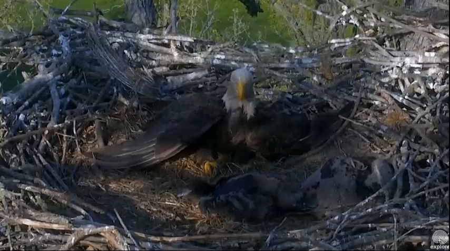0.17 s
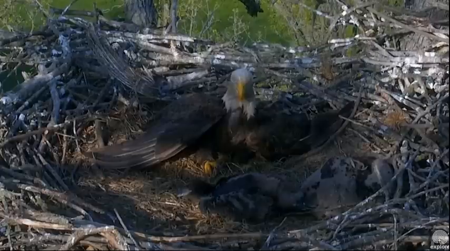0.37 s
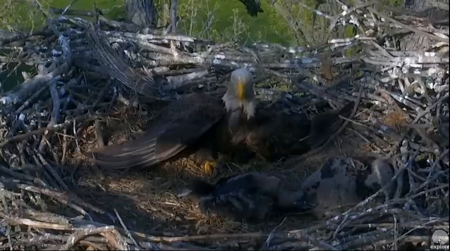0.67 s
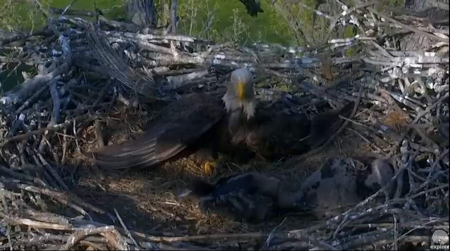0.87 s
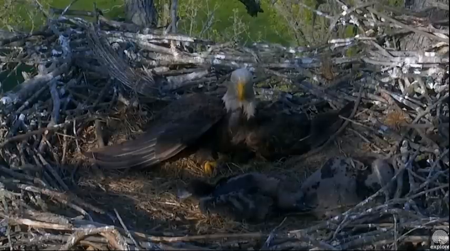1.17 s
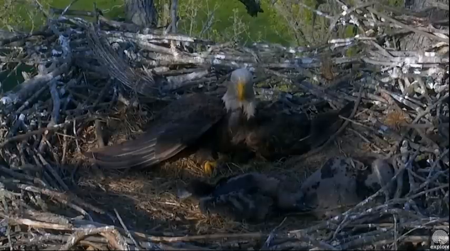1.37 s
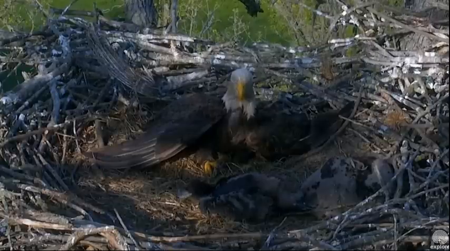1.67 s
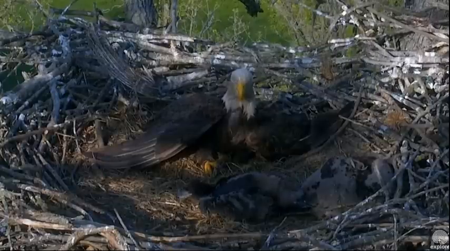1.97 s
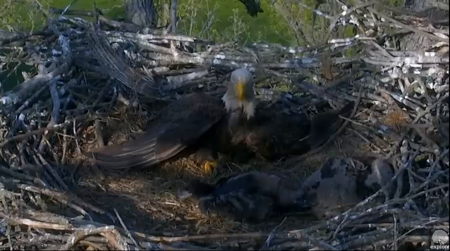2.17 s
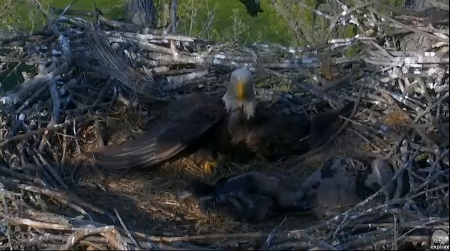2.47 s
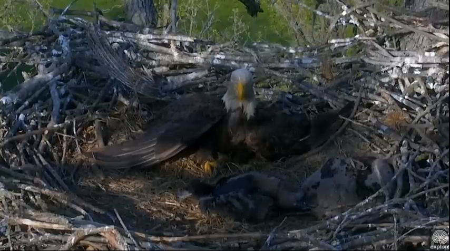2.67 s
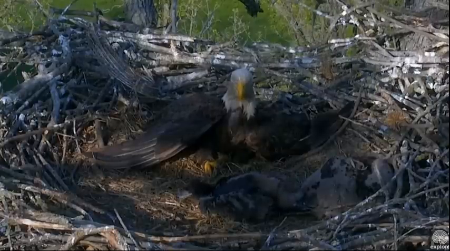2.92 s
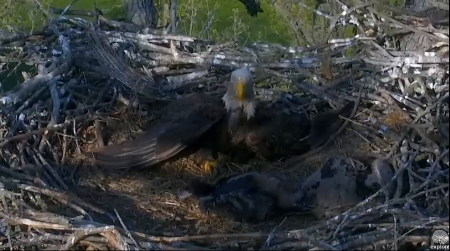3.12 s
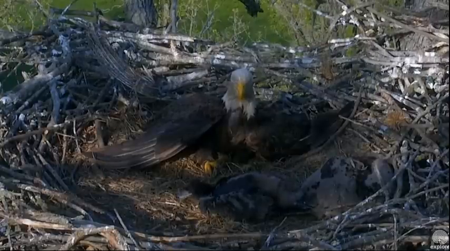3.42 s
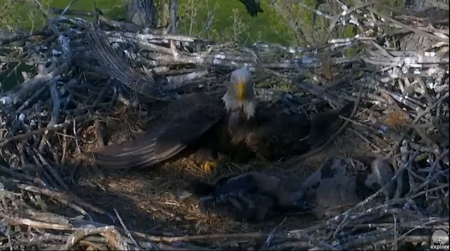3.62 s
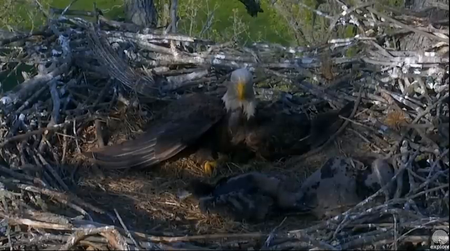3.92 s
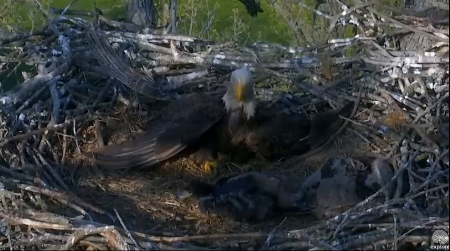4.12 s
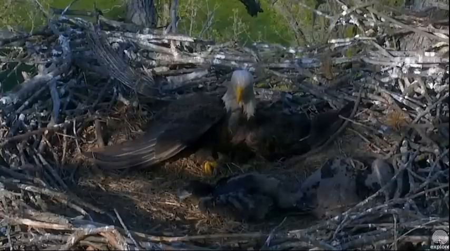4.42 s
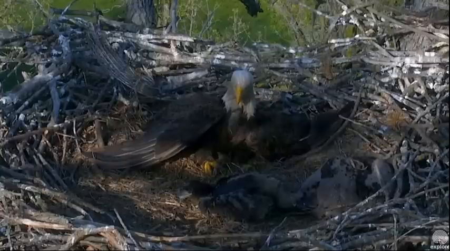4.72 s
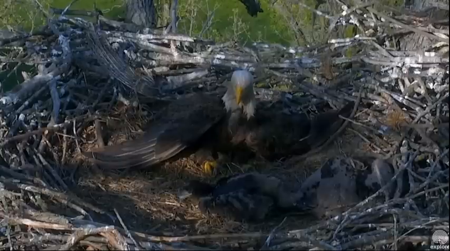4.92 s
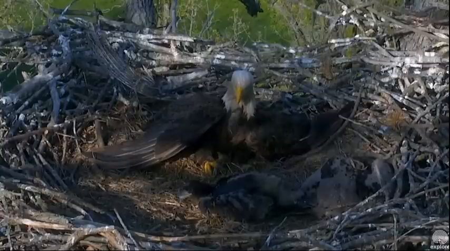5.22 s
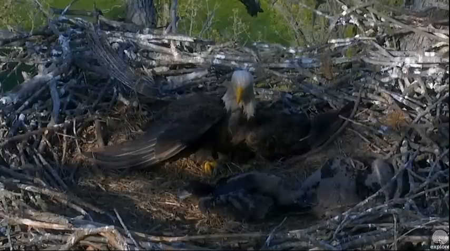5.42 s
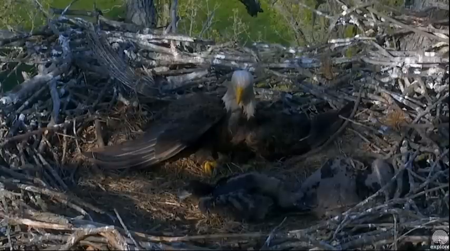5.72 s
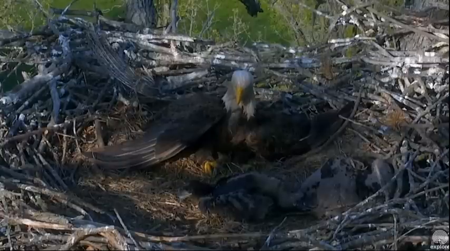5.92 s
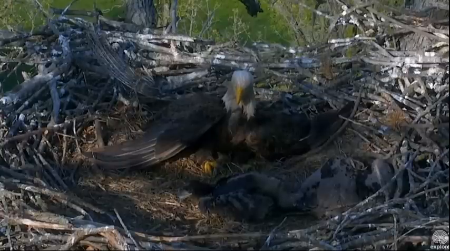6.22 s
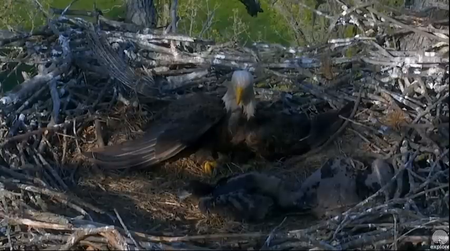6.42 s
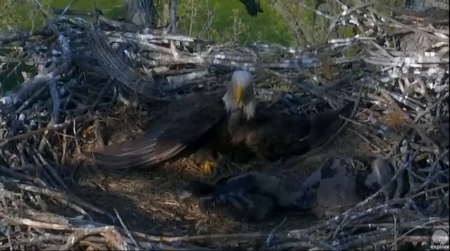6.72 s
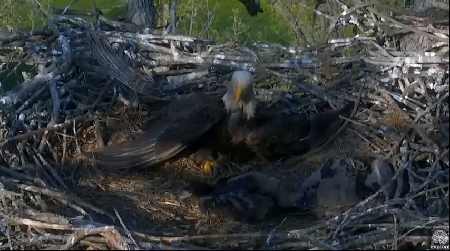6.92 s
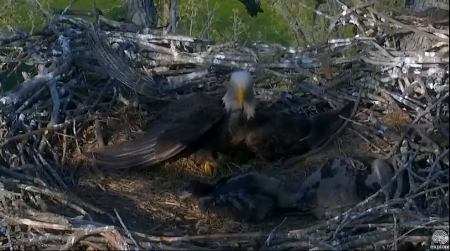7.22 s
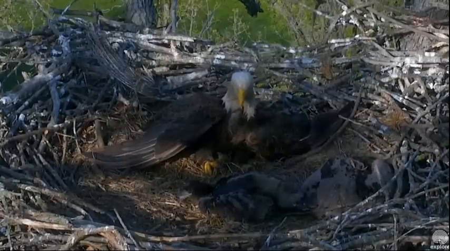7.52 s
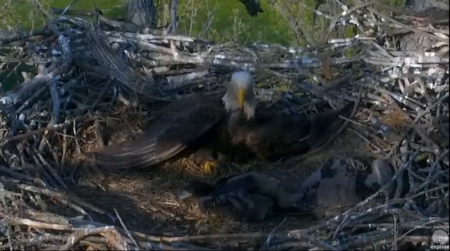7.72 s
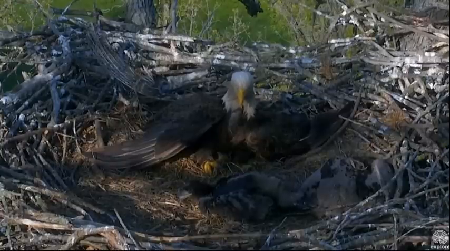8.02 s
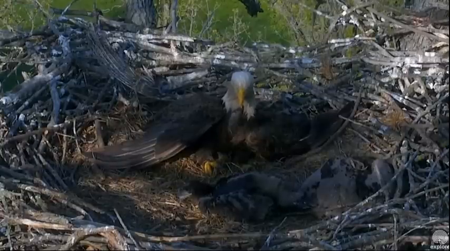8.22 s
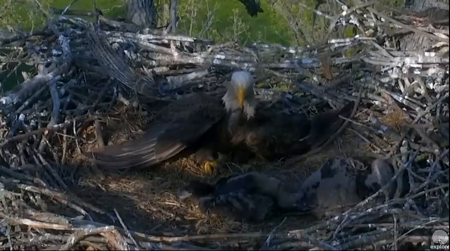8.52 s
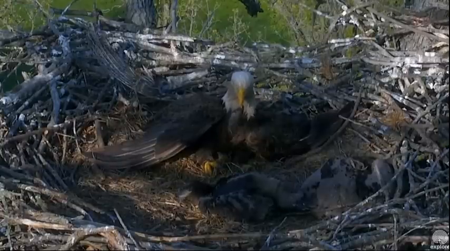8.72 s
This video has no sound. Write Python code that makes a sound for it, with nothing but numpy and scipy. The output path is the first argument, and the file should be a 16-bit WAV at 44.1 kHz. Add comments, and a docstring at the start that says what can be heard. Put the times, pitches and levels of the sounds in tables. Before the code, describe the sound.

Toads trill steadily outdoors, overlapping at different pitches, while small birds chirp faintly in the background over a soft hiss.

```python
"""Toads trill in a marsh, four overlapping voices that swell to one peak and then ease off.
Each trill is a fast run of pulses from the voice box that make the toad's throat sac ring.
Small birds chirp and twitter faintly among the trees, over a far toad chorus and soft hiss.
A camera's narrow-band microphone channel adds a low buzz, a thin motor whine
and faint mirror tones in the treble."""
import sys
import numpy as np
from scipy import signal
from scipy.fft import rfft, irfft
from scipy.io import wavfile

SR = 44100
rng = np.random.default_rng(int(sys.argv[2]) if len(sys.argv) > 2 else 0)


def master_out(mix):
    """Clip the mix to full scale and print it as 16-bit PCM to the path in sys.argv[1]."""
    frames = np.transpose(np.atleast_2d(mix))
    ceiling = np.clip(frames, -1, 1)
    pcm = np.round(ceiling * 32767).astype(np.int16)
    wavfile.write(sys.argv[1], SR, pcm)


N = 391166
TIME = np.arange(N) / SR
HZ = np.fft.rfftfreq(N, 1 / SR)

PEAK_S, BUILD_DB_PER_S, EASE_DB_PER_S = 5.74, 0.92, 2.45  # the toads egg each other on, then ease off
DRAG_HZ, DRAG_S = 3.8, .17  # the last pulses slow down as the air runs out
# When each toad calls and how fast it pulses; a negative slowing speeds it up.
# start_s, end_s, pulse_rate_hz, extra_starting_rate_hz, slowing_hz_per_s
TOAD_TRILLS = [(.014, 9.5, 44.906, 0, .2383), (1.203, 7.86, 41.864, 6.48, .0477),
               (1.902, 7.04, 47.207, 4.986, .737), (6.907, 9.5, 45.605, 0, -.933)]
# The toad behind each trill: low, near, high and far.
# pitch_hz, level_at_peak_db, fade_in_s, share_of_swell, open_share_of_pulse, slip_per_pulse_radians
TOAD_VOICES = [(1745, -51.5, 0.0067, 0.82, 0.48, 1.6), (1828, -47.5, 0.18, .7, 0.59, 1.222),
               (1929, -49.5, 0.014, 1.5, 0.38, 1.602), (1883, -60.5, .05, 0.5, .4, 1.8)]


def toad(trill, voice, settle_s=1.0, uneven_db=1.2, sac_half_width_hz=146):
    """The voice box opens and shuts; each opening makes the throat sac ring with one short tone."""
    start_s, end_s, base_hz, extra_hz, slowing = trill
    pitch_hz, level_db, fade_in_s, swell_share, open_share, slip_radians = voice
    age = np.maximum(TIME - start_s, 0)
    rate_hz = base_hz + extra_hz * np.exp(-age / settle_s) - slowing * age
    rate_hz -= DRAG_HZ * np.exp(np.minimum(TIME - end_s, 0) / DRAG_S)
    cycles = np.cumsum(rate_hz * (age > 0)) / SR
    pulse, place = cycles.astype(int), cycles % 1 - .5  # place is 0 in the middle of a pulse
    opening = np.exp(-abs(place / (open_share / 2)) ** 3)
    opening *= (1 - np.exp(-age / fade_in_s)) * np.clip((end_s - TIME) * 200, 0, 1)
    swell_db = np.minimum(BUILD_DB_PER_S * (TIME - PEAK_S), EASE_DB_PER_S * (PEAK_S - TIME))
    # each pulse is a little out of step with the last, and a little louder or softer
    slip, strength = rng.standard_normal((1024, 2)).T
    phase = 2 * np.pi * pitch_hz * TIME + slip_radians * np.cumsum(slip)[pulse] + 2 * wander(4)
    loudness = amp(level_db + swell_share * swell_db + uneven_db * strength[pulse])
    throat_sac = np.exp(-((HZ - pitch_hz) / sac_half_width_hz) ** 4)
    return filtered(loudness * opening * np.sin(phase) / np.sqrt(open_share / 2), throat_sac)


# Quick falling chirps: start_s, length_s, first_pitch_hz, level_db
BIRD_CHIPS = [(0.235, .05, 3030, -69.5), (0.31, 0.021, 4060, -71), (0.354, .048, 2920, -70.5),
              (.425, 0.046, 3190, -72), (0.529, 0.028, 3830, -71), (.637, 0.034, 3910, -77),
              (0.686, .042, 3970, -75.5), (0.821, 0.013, 3530, -68.5), (.863, .036, 3990, -77.5),
              (1.028, 0.05, 3090, -69), (1.039, .03, 4000, -76), (1.683, .055, 2680, -71),
              (2.236, 0.071, 3140, -73), (3.058, .045, 2940, -68), (4.19, .04, 2710, -65),
              (4.445, .05, 2710, -69), (5.74, 0.025, 3700, -72), (5.898, 0.03, 3800, -75.5),
              (8.277, 0.071, 3740, -73.5), (8.748, .03, 3840, -71.5)]
# Sliding whistles: start_s, length_s, middle_pitch_hz, slide_hz, level_db, roughness_0_to_1
BIRD_WHISTLES = [(.52, 0.18, 2210, 47, -71.5, 0.3), (.72, .06, 2920, 249, -72, 0.3),
                 (1.114, .048, 2390, 110, -68, 0.1), (1.157, .06, 2060, -115, -66.5, 0.1),
                 (1.691, 0.062, 2975, -170, -75, .5), (1.8, .096, 2150, 110, -74.5, .2),
                 (2.684, .13, 2274, -110, -67, 0.26), (2.962, 0.021, 2640, 391, -64, 0.12),
                 (3.415, 0.17, 3030, -43.5, -72.5, 0.15), (3.556, 0.1, 2760, -180, -64, 0.4),
                 (3.658, 0.16, 3276, 159, -62.5, 0.24), (3.762, 0.087, 3550, -160, -67, 0),
                 (5.157, 0.088, 2500, 247, -71.5, 0), (5.16, 0.11, 3120, 150.5, -78, .4),
                 (6.197, 0.15, 2440, 352.5, -75, .4), (6.818, 0.045, 3310, 529.5, -74, 0.65),
                 (7.006, .038, 3260, 576, -75, 0.44), (7.173, 0.018, 2540, 659, -74, .03),
                 (8.341, .09, 2840, 998, -74, 0.4), (8.45, 0.13, 3185, -200, -74, 0.34),
                 (8.601, 0.065, 2620, -340, -79, 0.3), (8.825, .05, 3370, 287.5, -75, 0.4)]
# Harsh buzzing calls: start_s, length_s, middle_pitch_hz, slide_hz, level_db
BIRD_RASPS = [(-.04, 0.28, 3230, 26, -68.5), (1.197, 0.11, 3020, -20, -75.5),
              (2.734, 0.38, 3167, 61.5, -67.5), (3.721, 0.24, 3180, -17, -69.5),
              (4.16, .12, 3250, -130, -74.5), (4.213, 0.29, 2494, 291.5, -72.5),
              (4.485, .2, 2870, 460, -73), (4.96, 0.38, 3030, 201, -73)]
# Calls that flick up, break and flick down: break_s, flick_length_s, top_pitch_hz, fall_level_db
BIRD_FLICKS = [(2.577, 0.047, 3170, -65), (4.705, 0.052, 3894, -64.5), (8.004, .034, 3030, -68)]


def birds(warble_hz=130, warble_depth_hz=300, light_roughness=.14, rasp_roughness=.9):
    """Each note is a gliding whistle; a fast, uneven wobble in pitch makes it rough."""
    along = np.linspace(0, 1, 5)  # five points from a note's start to its end
    chip_shape = 1 - .31 * along ** .94  # falls fastest at first
    notes = [(s, length, hz * chip_shape, db, light_roughness) for s, length, hz, db in BIRD_CHIPS]
    slides = list(BIRD_WHISTLES) + [(*rasp, rasp_roughness) for rasp in BIRD_RASPS]
    for start_s, length_s, hz, slide_hz, db, roughness in slides:
        notes.append((start_s, length_s, hz + slide_hz * (along - .5), db, roughness))
    for break_s, length_s, hz, db in BIRD_FLICKS:
        fall = hz * (1 - .28 * along ** 1.2)
        notes.append((break_s - length_s, length_s, fall[::-1], db - 2, light_roughness))  # softer rise
        notes.append((break_s, length_s, fall, db, light_roughness))
    out = np.zeros(N)
    warble = np.sin(2 * np.pi * warble_hz * TIME + 2.3 * wander(120))
    for start_s, length_s, pitches, db, roughness in notes:
        during = (TIME >= start_s) & (TIME < start_s + length_s)
        progress = (TIME[during] - start_s) / length_s
        pitch_hz = np.interp(progress, along, pitches) + warble_depth_hz * roughness * warble[during]
        loudness = amp(db) * np.sqrt(2 * np.sin(np.pi * progress))
        out[during] += loudness * np.sin(2 * np.pi * np.cumsum(pitch_hz) / SR)
    return out


# How the far twitter rises and falls: time_s, level_db
FLOCK_LEVELS = [(0, -68.5), (.4, -80), (1.3, -77), (2, -92), (3.2, -74), (5.3, -78.5), (6.3, -87),
                (7, -81.5), (7.6, -95), (8.87, -80.5)]


def far_flock(chips_per_s=40, low_hz=2500, high_hz=3500, pitch_count=20, fall_share=.22):
    """Distant birds scatter short falling chirps at many pitches."""
    out = np.zeros(N)
    for middle_hz in np.linspace(low_hz, high_hz, pitch_count):
        progress = np.linspace(0, 1, round(SR * rng.uniform(.015, .046)))
        pitch_hz = middle_hz * (1 + fall_share * (.5 - progress))
        chip = np.sin(np.pi * progress) * np.sin(2 * np.pi * np.cumsum(pitch_hz) / SR)
        starts = rng.random(N) < chips_per_s / pitch_count / SR
        out += signal.oaconvolve(starts * rng.uniform(.99, 1, N), chip)[:N]
    level_db = np.interp(TIME, *np.transpose(FLOCK_LEVELS))
    return unit(tree_echo(out, echo_db=.5, fade_s=.94)) * amp(level_db)


# Where the far toads ring: pitch_hz, half_width_hz, level_db
CHORUS_BANDS = [(1588, 48, -73), (1751, 180, -62), (1890, 72, -75)]


def far_chorus():
    """Many distant toads blur into bands of softly ringing noise."""
    return sum(amp(db) * unit(filtered(rng.standard_normal(N), np.exp(-((HZ - hz) / width) ** 2)))
               for hz, width, db in CHORUS_BANDS)


# Tones of a small motor: multiple_of_shaft_speed, level_db
MOTOR_TONES = [(7, -80), (8, -84.5), (9, -68.5), (10, -75), (11, -94), (12, -67), (14, -70), (15, -67.5),
               (25, -101.5), (34, -93)]


def motor_whine(shaft_hz=97.15, drift_share=.00047, waver_db=.53):
    """A spinning shaft makes a stack of tones that drift together with its speed."""
    angle = 2 * np.pi * np.cumsum(shaft_hz * (1 + drift_share * wander(.91))) / SR
    out = np.zeros(N)
    for multiple, db in MOTOR_TONES:
        out += amp(db + waver_db * wander(5.7)) * np.sin(multiple * angle + 2 * np.pi * rng.random())
    return np.sqrt(2) * out


# Tones of the electrical buzz: multiple_of_frame_rate, level_db
BUZZ_TONES = [(1, -81), (2, -78.5), (3, -77.5), (4, -84), (5, -80), (6, -86.5), (7, -87), (8, -88),
              (10, -86), (13, -87.5)]


def camera_buzz(frame_hz=30, scatter_radians=1.3):
    """The camera's circuits tick once a frame, fast enough to make a low buzz."""
    phase = 2 * np.pi * frame_hz * (TIME + .0036)
    return -np.sqrt(2) * sum(amp(db) * np.sin(multiple * phase + scatter_radians * rng.uniform(-.92, 1))
                             for multiple, db in BUZZ_TONES)


# Two lone tones: pitch_hz, level_db
FAINT_TONES = [(404.8, -84), (1012, -77.5)]


def faint_tones():
    """Quiet tones hold an almost steady pitch."""
    return np.sqrt(2) * sum(amp(db) * np.sin(2 * np.pi * hz * TIME + .6 * wander(2))
                            for hz, db in FAINT_TONES)


# Strength of the background hiss from low to high: frequency_hz, level_db_per_hz
AIR_HISS = [(10, -112), (70, -104), (300, -101), (600, -100), (740, -95.5), (1000, -93), (1130, -99),
            (1420, -95), (1900, -97), (2100, -106.5), (3200, -110), (3600, -115), (4000, -122)]


def air():
    """Outdoor air and microphone hiss make a steady wash."""
    return filtered(rng.standard_normal(N), gain_curve(AIR_HISS)) * np.sqrt(SR / 2)


def tree_echo(sound, echo_db, fade_s, echoes_per_s=2000):
    """Trunks and leaves scatter a thin tail after each sound; it drops 60 dB in fade_s."""
    delay_s = TIME[:SR]
    echoes = rng.standard_normal(SR) * (rng.random(SR) < echoes_per_s / SR)
    echoes *= amp(-60 * delay_s / fade_s) * (delay_s > .008)
    return sound + amp(echo_db) * signal.fftconvolve(sound, echoes / np.linalg.norm(echoes))[:N]


def amp(db):
    """Turns decibels into a gain to multiply by."""
    return 10 ** (np.asarray(db) / 20)


def unit(sound):
    """Scales a sound to an average strength (rms) of 1."""
    return sound / np.sqrt(np.mean(sound ** 2) + 1e-30)


def gain_curve(points):
    """Joins (frequency_hz, level_db) points into a gain for every frequency."""
    hz, db = np.transpose(points)
    return amp(np.interp(np.log(HZ + 1), np.log(hz), db))


def filtered(sound, gain):
    """Turns each frequency up or down by its gain."""
    return irfft(rfft(sound) * gain, N)


def wander(rate_hz):
    """A smooth random wobble that changes about rate_hz times a second."""
    return unit(filtered(rng.standard_normal(N), np.exp(-(HZ / rate_hz) ** 2) * (HZ > 0)))


def scene():
    """Four toads and the birds among trees, over the far chorus, hiss and hum."""
    toads = sum(toad(trill, voice) for trill, voice in zip(TOAD_TRILLS, TOAD_VOICES))
    chirps = tree_echo(birds(), echo_db=-4.5, fade_s=.88) + far_flock()
    toads = tree_echo(toads, echo_db=-15, fade_s=.45)
    background = far_chorus() + air() + motor_whine() + camera_buzz() + faint_tones()
    return (toads + chirps + background)[None]


# How much the channel's smoothing turns down the treble: frequency_hz, gain_db
CHANNEL_SMOOTHING = [(3000, -1), (4000, -4.5), (4800, -11.5), (5600, -21), (6200, -32.5), (7200, -55.5),
                     (8800, -53), (9800, -41.5), (11200, -27.5), (12800, -30.5), (14200, -47.5),
                     (15500, -59.5)]


def record(dry, sample_rate_hz=8000, hiss_db=-97, cutoff_hz=15800):
    """A slowly sampled channel keeps the lower band and leaks faint mirror copies into the treble."""
    band = filtered(dry[0], HZ < sample_rate_hz / 2)
    mirrors = 2 * band * sum(np.cos(2 * np.pi * k * sample_rate_hz * TIME) for k in (1, 2))
    smoothed = filtered(band + mirrors, gain_curve(CHANNEL_SMOOTHING))
    hiss = amp(hiss_db) * rng.standard_normal(N)
    return filtered(smoothed + hiss, HZ < cutoff_hz)[None]


dry = scene()
out = record(dry)
master_out(out)
```